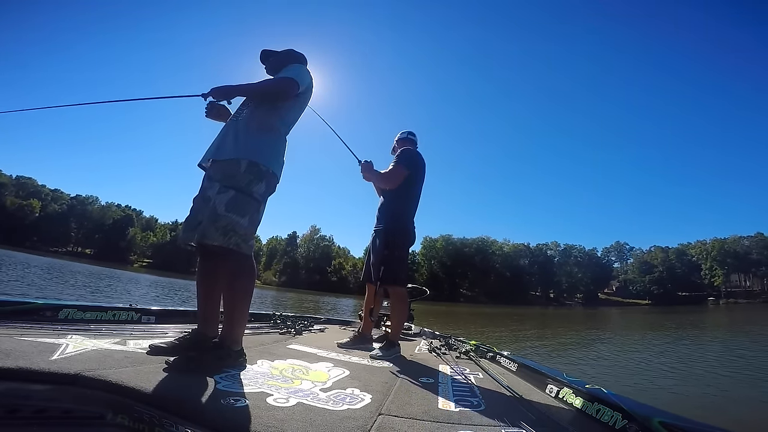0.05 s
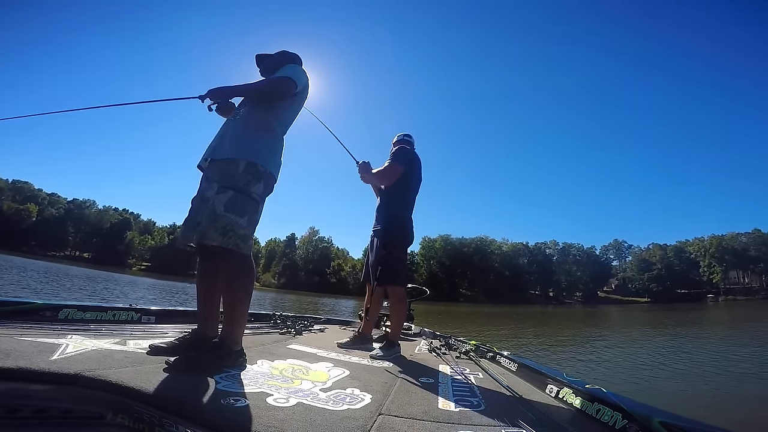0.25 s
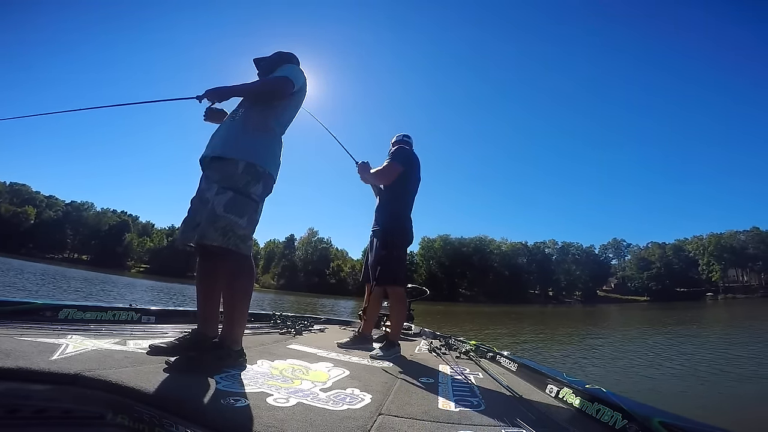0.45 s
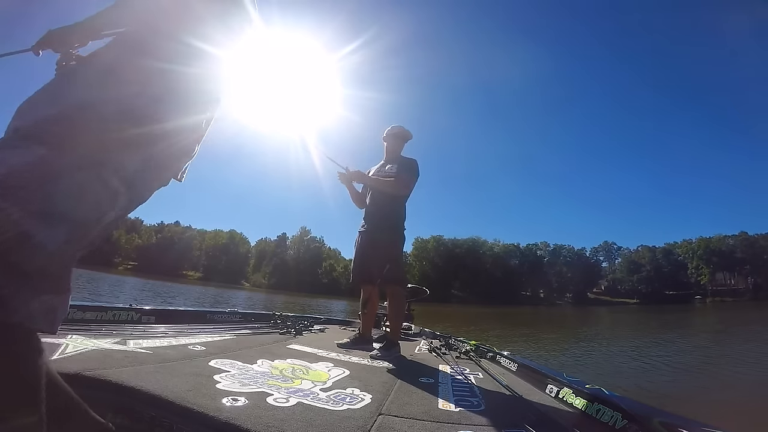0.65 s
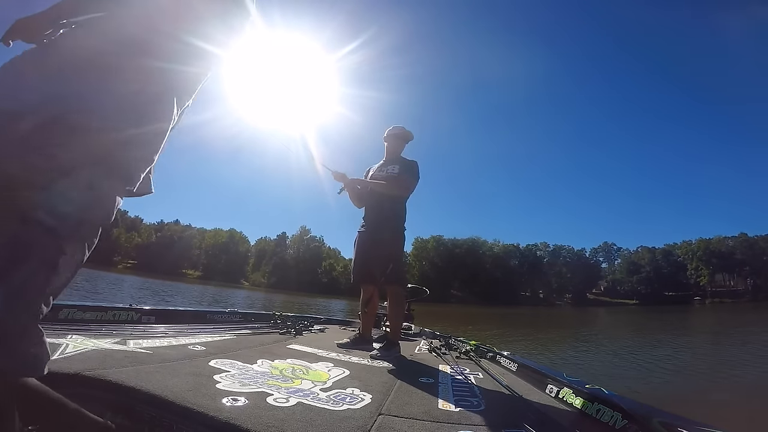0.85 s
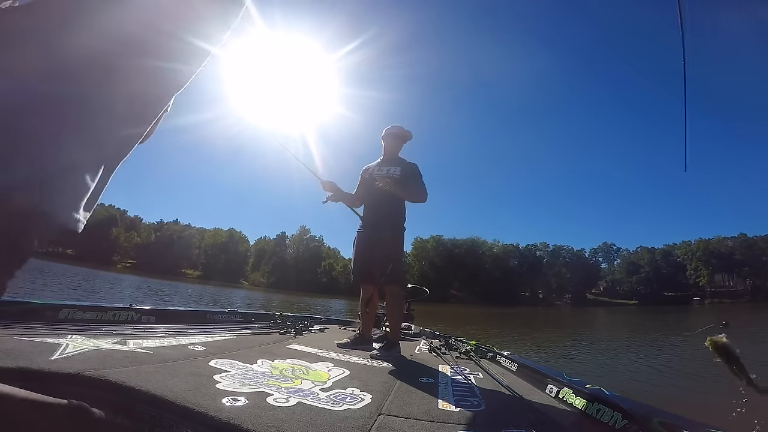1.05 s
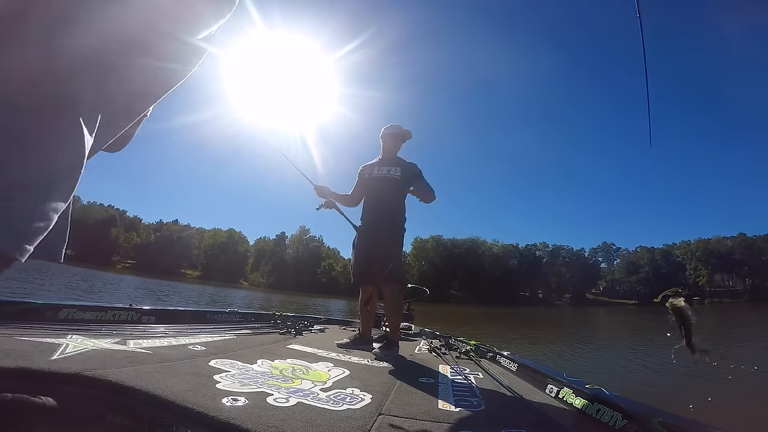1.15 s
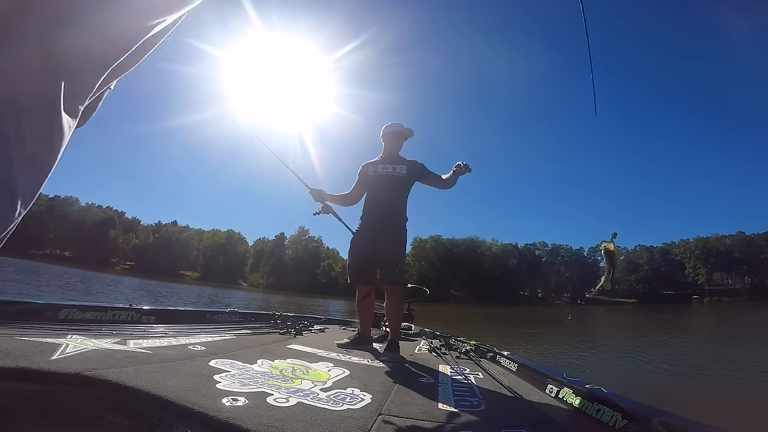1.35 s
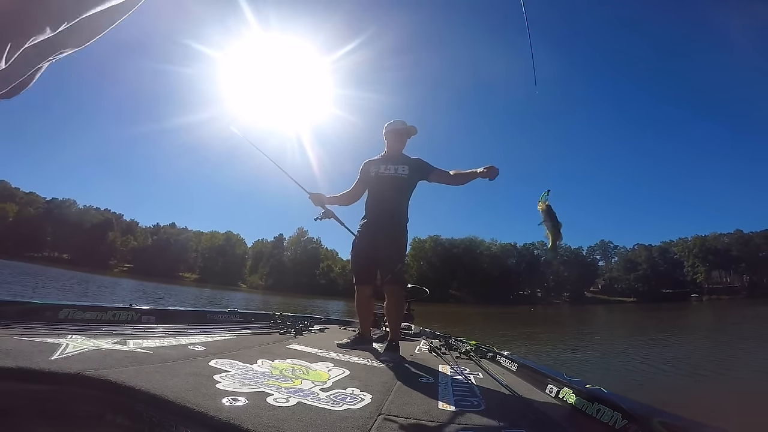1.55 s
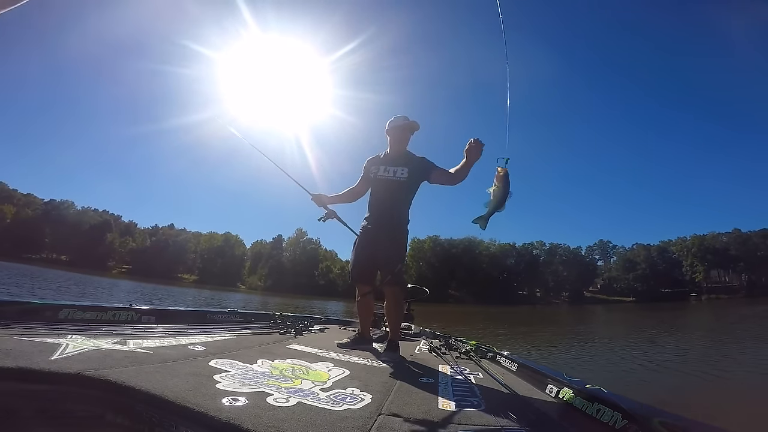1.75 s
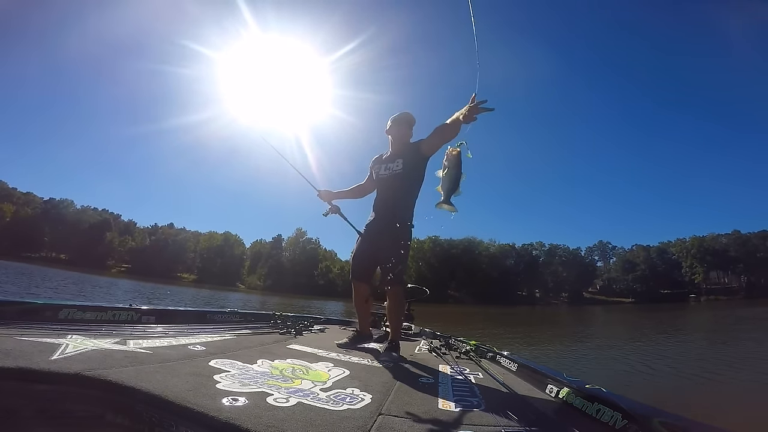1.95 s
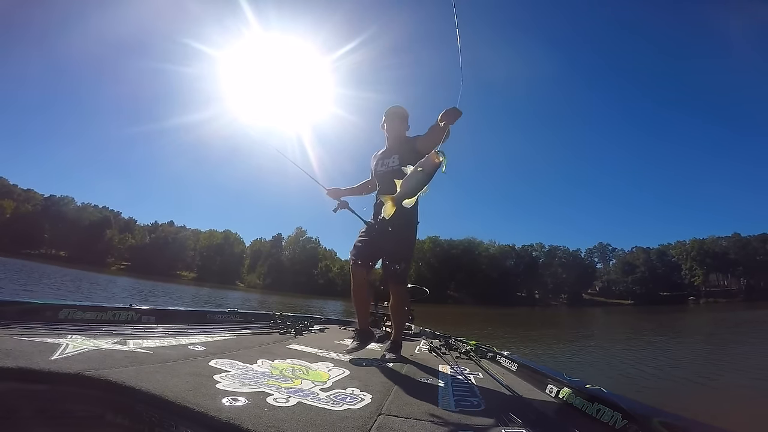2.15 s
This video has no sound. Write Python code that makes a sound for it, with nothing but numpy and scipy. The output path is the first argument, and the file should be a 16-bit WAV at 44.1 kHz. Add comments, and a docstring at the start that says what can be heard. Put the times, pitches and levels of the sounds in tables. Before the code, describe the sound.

Wind rumbles and thumps unevenly against a camera microphone on an open boat deck; after a dry tackle snap, a hooked fish plops, slaps and gurgles out of the lake close by, with light spray.

```python
"""Wind buffets a camera microphone on an open boat deck: shaped noises make a low rumble, faster eddies
and a rough flutter, and single pressure pulses make the thumps.
Beside the boat a hooked fish is pulled from the lake: ringing bubbles plop and gurgle, noise bursts slap,
and random impulses, hiss and spiky noise make the spray.
Fishing tackle ticks in short noise bursts and snaps once, over the faint noise wash of the water."""
import sys
import numpy as np
from scipy import signal
from scipy.fft import rfft, irfft
from scipy.io import wavfile
from scipy.ndimage import uniform_filter1d

SR = 44100
rng = np.random.default_rng(int(sys.argv[2]) if len(sys.argv) > 2 else 0)


def generate_wav(sig):
    """Save sig (samples, or channels by samples) to the path in sys.argv[1] as 16-bit PCM at SR."""
    pcm = np.round(np.clip(np.atleast_2d(sig).T, -1, 1) * 32767).astype(np.int16)
    wavfile.write(sys.argv[1], SR, pcm)


N = 97020  # samples, 2.2 s

# Spectrum of the lake wash. Each row: frequency in Hz, relative density in dB.
LAKE_SPECTRUM = [(150, 8), (400, 3.5), (620, 3), (820, 7.5), (1000, -2), (1170, 3), (1400, -11.5),
                 (2000, -11.5), (2800, -11.5), (3600, -14), (5500, -16.5), (7500, -21.5), (11000, -22.5),
                 (15000, -27.5)]
LAKE_DB = -47

# Sharp ticks of tackle and flung drops. Each row: start in seconds, relative level in dB,
# centre in Hz, spread in octaves, decay time constant in seconds.
TACKLE_TICKS = [(.423, -47, 5300, 0.19, 0.0014), (.426, -47.5, 2980, 0.25, 0.0039),
                (.448, -38, 5100, 0.16, 0.0011), (.4485, -49, 3400, 0.14, .0016),
                (.482, -59, 4400, 0.12, 0.0021), (.902, -50, 5400, 0.28, .0015),
                (.912, -54, 6300, .3, .001), (.945, -52, 5400, .3, .0015),
                (.960, -44.5, 5240, 0.24, 0.0016), (.9605, -47, 2500, .3, .002),
                (.9715, -40, 5600, 0.37, 0.0008), (1.328, -35.5, 5470, 0.46, 0.0041),
                (1.417, -33.5, 2920, 0.58, 0.0016), (1.4305, -43, 2700, 0.45, 0.0013),
                (1.448, -47, 4800, .6, .001), (1.543, -52.5, 5600, .1, 0.0047),
                (2.162, -49.5, 5570, 0.077, 0.0045)]
# Slaps of water. Each row: start in seconds, relative level in dB,
# centre in Hz, spread in octaves, decay time constant in seconds.
WATER_SLAPS = [(.673, -40, 420, .4, 0.0054), (.729, -51, 2500, 0.34, 0.004),
               (.755, -49.5, 2160, 0.29, 0.01), (1.002, -44, 550, 0.28, 0.0033),
               (1.044, -43, 1050, 0.22, 0.011), (1.046, -55, 4860, 0.18, .01),
               (1.092, -37, 950, 0.54, 0.01), (1.093, -42, 3000, 0.56, 0.0093),
               (1.111, -52, 800, 0.4, 0.01), (1.124, -27, 1074, 0.14, 0.0032), (1.143, -38, 850, .28, .013),
               (1.156, -32, 1080, 0.3, 0.0094), (1.1845, -22, 736, 0.7, 0.003),
               (1.211, -29, 780, 0.55, 0.0048), (1.324, -44.5, 2190, .8, 0.0058),
               (1.3275, -29, 1100, 0.89, 0.0041), (1.380, -27.5, 646, 0.43, 0.0025),
               (1.410, -34, 640, 0.73, 0.0069), (1.581, -42, 1300, 0.96, 0.012),
               (1.589, -35.5, 900, 0.42, 0.026), (1.606, -42, 2300, 0.24, 0.007),
               (1.632, -44, 1500, 0.38, 0.014), (1.760, -40, 470, 0.68, 0.028),
               (1.792, -36, 620, .22, .009), (2.075, -35.5, 850, 0.53, 0.013)]
# Peak of the first crack in dB, beside a noise of rms 2 (+6 dB).
SLAP_CRACK_DB, TICK_CRACK_DB = -4, 7
HIT_ATTACK_S = 0.00021

# Spectrum of the tackle snap. Each row: frequency in Hz, relative density in dB.
SNAP_SPECTRUM = [(250, 16), (700, 21), (1200, 12), (2500, 4), (5000, -1), (9000, -7), (15000, -3)]
SNAP_S, SNAP_PEAK_DB = .6315, -20.5

# Course of the churned water. Each row: time in seconds, level before the trim in dB.
CHURN_LEVEL = [(.62, -68), (.68, -47.5), (.76, -35.5), (.83, -51.5), (.94, -47), (1.01, -63), (1.08, -33.5),
               (1.125, -30.5), (1.19, -29), (1.24, -41), (1.34, -42.5), (1.39, -38), (1.46, -59),
               (1.56, -44), (1.59, -36), (1.66, -32.5), (1.72, -53.5), (1.795, -39.5), (1.83, -51.5),
               (2.03, -45), (2.18, -68)]
# Spectrum of the churned water. Each row: frequency in Hz, relative density in dB.
CHURN_SPECTRUM = [(200, 2), (380, -1), (470, 1), (560, 2.5), (780, 2), (950, -4.5), (1150, -0.5),
                  (1400, -7.5), (1800, -36), (3000, -22), (6000, -58)]
CHURN_TRIM_DB, CHURN_STEADY_S = 0.5, 0.088
BUBBLES_PER_S, BUBBLE_SPREAD_DB = 1500, 2
BUBBLE_CYCLES = 8.3  # cycles at the starting pitch within the t60
BUBBLE_RISE = 0.055  # fraction by which the pitch climbs within the t60

# Large single bubbles. Each row: start in seconds, starting pitch in Hz,
# level before attack and decay in dB, ring t60 in seconds.
LARGE_BUBBLES = [(.7275, 650, -19, 0.057), (.740, 634, -22.5, 0.057), (1.124, 392, -14.5, 0.066),
                 (1.150, 768, -23.5, 0.089), (1.182, 1110, -18, 0.012), (2.038, 1094, -26, 0.025)]
PLOP_RISE_PER_S, PLOP_ATTACK_S = 3.9, 0.00052

# Course of the spray. Each row: time in seconds, level before the trim in dB.
SPRAY_LEVEL = [(.62, -69), (.75, -54.5), (.81, -58.5), (1.02, -61), (1.10, -50), (1.21, -46.5),
               (1.30, -49.5), (1.39, -46), (1.44, -51), (1.49, -61.5), (1.565, -57.5), (1.585, -41.5),
               (1.63, -49), (1.675, -45), (1.70, -55.5), (1.9, -63), (1.98, -51.5), (2.05, -58.5),
               (2.18, -56.5)]
# Spectrum of the spray. Each row: frequency in Hz, relative density in dB.
SPRAY_SPECTRUM = [(700, -34), (1600, 5), (2200, 0), (2900, 6), (3500, -3.5), (5000, 0), (6300, -1),
                  (7100, -10.5), (8200, -10), (9200, -14.5), (15000, -20)]
DROPS_PER_S, DROP_SPREAD_DB = 3200, 5
MIST_DB, SPRAY_TRIM_DB = -2, 1  # hiss relative to the drops before filtering; trim of the whole

# Showers of fine droplets. Each row: middle in seconds, level in dB, Gaussian half-length in seconds.
DROPLET_SHOWERS = [(0.728, -54, 0.038), (1.378, -49, 0.019), (1.669, -45.5, 0.017)]
# Spectrum of the showers. Each row: frequency in Hz, relative density in dB.
SHOWER_SPECTRUM = [(2000, -24), (4000, -7), (5500, 2), (6500, -2), (7500, -11), (10000, -11), (15000, -17)]

# Course of the deep wind rumble. Each row: time in seconds, level before the trim in dB.
RUMBLE_LEVEL = [(0.0, -26), (0.05, -20), (0.09, -38), (0.14, -19), (0.19, -18), (0.27, -23.5),
                (0.36, -23.5), (0.41, -27), (0.48, -27), (0.52, -19.5), (0.59, -19), (0.64, -26),
                (0.66, -20), (0.77, -20.5), (0.82, -22), (1.21, -22.5), (1.25, -23), (1.29, -28),
                (1.36, -20), (1.45, -14), (1.57, -10.5), (1.61, -27), (1.70, -18.5), (1.76, -20),
                (1.83, -26.5), (1.87, -25.5), (2.03, -24), (2.09, -18), (2.13, -16.5), (2.19, -11.5)]
# Course of the faster eddies at the port. Each row: time in seconds, level before the trim in dB.
EDDY_LEVEL = [(0.0, -33.5), (0.17, -31), (0.3, -35), (0.63, -37), (0.67, -26.5), (0.72, -25), (0.77, -21),
              (0.85, -28), (0.92, -24), (1.0, -27), (1.13, -24.5), (1.17, -19.5), (1.23, -29), (1.35, -21),
              (1.47, -20), (1.56, -25.5), (1.64, -27), (1.86, -33.5), (1.885, -16.5), (1.915, -39),
              (1.955, -21), (1.99, -19), (2.02, -33), (2.06, -27), (2.1, -19.5), (2.19, -17.5)]
# Course of the rough flutter in stronger gusts. Each row: time in seconds, level before the trim in dB.
FLUTTER_LEVEL = [(0, -45), (.63, -51), (.675, -28.5), (.73, -33.5), (.765, -25.5), (.81, -32), (.90, -28.5),
                 (.97, -34), (1.07, -32), (1.18, -28.5), (1.29, -43.5), (1.38, -32), (1.41, -31.5),
                 (1.455, -23.5), (1.49, -32.5), (1.58, -29), (1.70, -37.5), (1.79, -33.5), (1.86, -38.5),
                 (1.97, -42), (2.05, -45), (2.085, -26), (2.19, -32.5)]
# Spectra of the three wind layers. Each row: frequency in Hz, relative density in dB.
RUMBLE_SPECTRUM = [(5, -32), (13, -2), (24, -1.5), (38, -1.5), (52, 0), (72, -6), (95, -13), (140, -39),
                   (250, -76), (600, -85)]
EDDY_SPECTRUM = [(50, -25), (90, -3), (120, 0), (155, -1), (200, -10), (270, -18), (450, -35), (800, -37.5),
                 (1600, -53.5), (5000, -76)]
FLUTTER_SPECTRUM = [(130, 4.5), (220, 7.5), (280, 3.5), (400, 0), (520, -10.5), (800, -23), (1500, -56),
                    (4000, -70)]
RUMBLE_TRIM_DB, EDDY_TRIM_DB, FLUTTER_TRIM_DB = 1.5, -1, -1.5
RUMBLE_STEADY_S, EDDY_STEADY_S = 0.052, 0.02  # the flutter shares the second span

# Single buffets of wind. Each row: centre in seconds, direction of the pressure, peak in dB,
# half-width to the zero crossing in seconds.
WIND_BUFFETS = [(.068, 'suck', -4, 0.0063), (0.12, 'push', -7.5, 0.0046), (.181, 'push', -9, 0.0032),
                (.354, 'push', -9.5, 0.0034), (0.58, 'push', -16, 0.0035), (0.671, 'suck', -11, 0.0018),
                (.713, 'suck', -9.5, 0.0046), (0.768, 'suck', -1, 0.0034), (0.786, 'push', -6, 0.0051),
                (1.254, 'suck', -4, 0.0055), (1.405, 'push', -3, 0.0047), (1.440, 'suck', -11.5, 0.0014),
                (1.464, 'suck', -10, 0.002), (1.471, 'push', -4, 0.0028), (1.499, 'push', -5, 0.0032),
                (1.52, 'suck', -3.5, 0.0054), (1.575, 'suck', -2.5, 0.0041), (1.708, 'push', -6, 0.0065),
                (1.952, 'push', -9.5, 0.0053), (1.984, 'push', -7, 0.0025), (2.092, 'suck', -2, 0.0032),
                (2.174, 'suck', -2.5, 0.0048)]
# Sign of the pressure. Each entry: direction, factor without unit.
PRESSURE_SIGN = {'push': 1, 'suck': -1}

ROUNDING_CEILING, TOP_HZ = .95, 15500  # full-scale amplitude, low-pass edge


def undb(db):
    """Amplitude gain is the antilogarithm of decibels over twenty."""
    return 10 ** (np.asarray(db) / 20)


def unit(x):
    """Normalisation: dividing by the root mean square gives rms 1."""
    return x / np.sqrt(np.mean(x ** 2))


def swell(curve):
    """Amplitude envelope: levels in dB are interpolated over time and turned into gain."""
    return undb(np.interp(np.arange(N) / SR, *np.array(curve).T))


def colour(x, points):
    """Linear filtering: the spectrum is weighted along a log-frequency curve, then set to rms 1."""
    point_hz, point_db = np.array(points).T
    hz = np.maximum(np.arange(N // 2 + 1) * SR / N, 1)
    weight = undb(np.interp(np.log(hz), np.log(point_hz), point_db))
    return unit(irfft(rfft(x) * weight, N))


def steady(x, span_s):
    """Envelope division: chance swells of a noise slower than the span are evened out."""
    size = max(int(span_s * SR), 2)
    power = np.abs(signal.hilbert(x)) ** 2
    smooth_power = uniform_filter1d(uniform_filter1d(power, size), size)
    return unit(x / np.sqrt(smooth_power + 1e-9))


def add(out, start_s, x):
    """Superposition: a sound is summed in at its start time."""
    i = int(start_s * SR)
    out[i:i + len(x)] += x[:max(len(out) - i, 0)]


def lake():
    """Stationary random noise: the faint, even wash of ripples and distant trees."""
    return colour(rng.standard_normal(N), LAKE_SPECTRUM) * undb(LAKE_DB)


def hits(rows, crack_db):
    """Impact: a crack at first contact with a decaying noise burst, both in one band."""
    out, size = np.zeros(N), 4096
    t = np.arange(size) / SR
    f = np.maximum(np.arange(size // 2 + 1) * SR / size, 1)
    for start, db, hz, octaves, decay in rows:
        register = np.exp(-.5 * (np.log2(f / hz) / octaves) ** 2)
        noise = steady(irfft(rfft(rng.standard_normal(size)) * register), span_s=0.005)
        crack = np.roll(irfft(register), int(SR / hz))  # one period late, clear of the attack
        burst = 2 * noise + undb(crack_db) * crack / crack.max()
        envelope = np.exp(-t / decay) * (1 - np.exp(-t / HIT_ATTACK_S))
        add(out, start, undb(db) * burst * envelope)
    return out


def ticks():
    """Impact of small hard bodies: tackle and flung drops give a strong crack and a brief burst."""
    return hits(TACKLE_TICKS, TICK_CRACK_DB)


def snap():
    """Impulse response: one filtered unit pulse is a dry snap of the tackle."""
    impulse = 1. * (np.arange(N) == int(SNAP_S * SR))
    click = colour(impulse, SNAP_SPECTRUM)
    return undb(SNAP_PEAK_DB) * click / click.max()


def spray():
    """Random impulses: countless small drops crackle on the water over a fine hiss."""
    chance, size = rng.random(N), rng.exponential(size=N)
    sign, mist = rng.choice([-1, 1], N), rng.standard_normal(N)
    drops = (chance < DROPS_PER_S / SR) * sign * undb(DROP_SPREAD_DB * np.minimum(size, 5))
    mixture = unit(drops) + undb(MIST_DB) * mist
    return colour(mixture, SPRAY_SPECTRUM) * swell(SPRAY_LEVEL) * undb(SPRAY_TRIM_DB)


def showers():
    """Spiky noise in Gaussian envelopes: sheets of the finest droplets land with a bright fizz."""
    t = np.arange(N) / SR
    level = np.zeros(N)
    for middle, db, length in DROPLET_SHOWERS:
        level += undb(db) * np.exp(-.5 * ((t - middle) / length) ** 2)
    return level * colour(rng.laplace(size=N), SHOWER_SPECTRUM)


def slaps():
    """Impact on a liquid: each slap of water is a crack and a burst in its own band."""
    return hits(WATER_SLAPS, SLAP_CRACK_DB)


def bubble(hz, t60, rise_per_s):
    """Damped oscillation of trapped air: the pitch climbs as the bubble nears the surface."""
    t = np.arange(int(t60 * SR) + 2) / SR
    cycles = hz * t * (1 + rise_per_s * t / 2)
    return np.sin(2 * np.pi * cycles) * np.exp(-np.log(1000) * t / t60)


def plops():
    """Resonance of large air pockets: each closes and rings with a rising pitch."""
    out = np.zeros(N)
    for start, hz, db, t60 in LARGE_BUBBLES:
        ring = bubble(hz, t60, PLOP_RISE_PER_S)
        attack = 1 - np.exp(-np.arange(len(ring)) / SR / PLOP_ATTACK_S)
        add(out, start, undb(db) * ring * attack)
    return out


def churn():
    """Superposed damped resonances: thrashed water gurgles as a crowd of short-lived bubbles."""
    out = np.zeros(N)
    for when, pitch, size, sign in rng.random((int(BUBBLES_PER_S * N / SR), 4)):
        hz = 300 * 8 ** pitch  # 300 to 2400 Hz, even in octaves
        t60 = BUBBLE_CYCLES / hz
        strength = undb(-BUBBLE_SPREAD_DB * np.log(1 - size))
        gain = np.sign(sign - .5) * np.sqrt(hz) * strength
        add(out, when * N / SR, gain * bubble(hz, t60, BUBBLE_RISE / t60))
    gurgle = steady(colour(out, CHURN_SPECTRUM), CHURN_STEADY_S)
    return gurgle * swell(CHURN_LEVEL) * undb(CHURN_TRIM_DB)


def buffets():
    """Vortex passage at the port: a brief push or suction between two softer opposite swings."""
    out = np.zeros(N)
    for when, direction, db, width in WIND_BUFFETS:
        u = (np.arange(N) / SR - when) / width
        pressure = (1 - u ** 2) / (1 + u ** 2 / 9) ** 6
        out += PRESSURE_SIGN[direction] * undb(db) * pressure
    return out


def wind():
    """Turbulent pressure on the microphone: slow large eddies, quick small ones and a rough flutter."""
    rumble = steady(colour(rng.standard_normal(N), RUMBLE_SPECTRUM), RUMBLE_STEADY_S)
    eddies = steady(colour(rng.standard_normal(N), EDDY_SPECTRUM), EDDY_STEADY_S)
    flutter = steady(colour(rng.standard_normal(N), FLUTTER_SPECTRUM), EDDY_STEADY_S)
    rumble *= swell(RUMBLE_LEVEL) * undb(RUMBLE_TRIM_DB)
    eddies *= swell(EDDY_LEVEL) * undb(EDDY_TRIM_DB)
    flutter *= swell(FLUTTER_LEVEL) * undb(FLUTTER_TRIM_DB)
    return rumble + eddies + flutter


def scene():
    """Superposition: lake, tackle, splashing fish and wind add at one microphone."""
    tackle = ticks() + snap()
    fish = spray() + showers() + slaps() + plops() + churn()
    return (lake() + tackle + fish + buffets() + wind())[None]


def record(dry):
    """Saturation and low-pass filtering: the camera rounds the strongest gusts and cuts the top."""
    rounded = ROUNDING_CEILING * np.tanh(dry / ROUNDING_CEILING)
    low_pass = signal.ellip(8, .2, 70, TOP_HZ, fs=SR, output="sos")
    return signal.sosfilt(low_pass, rounded)


dry = scene()
out = record(dry)
generate_wav(out)
```